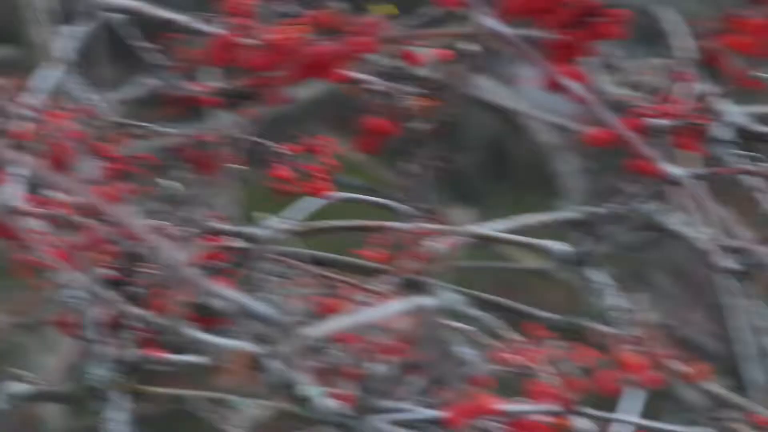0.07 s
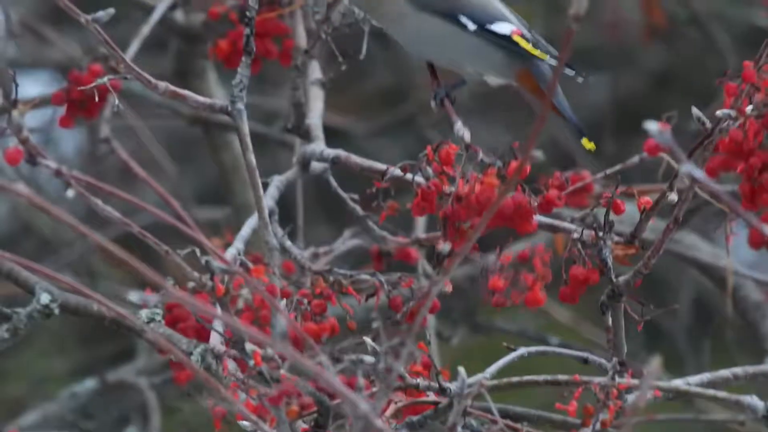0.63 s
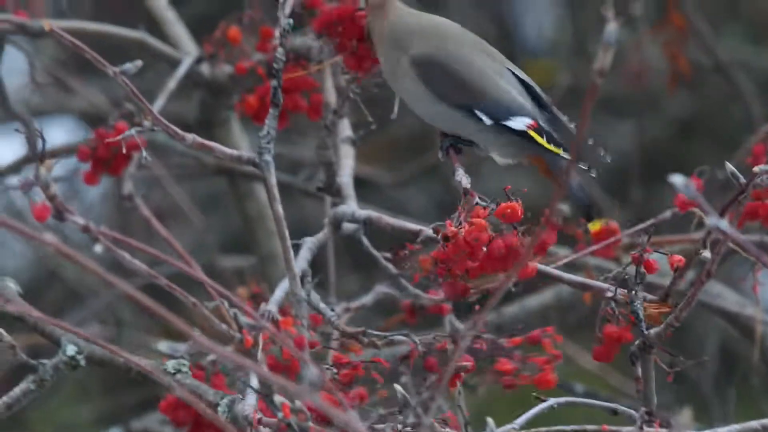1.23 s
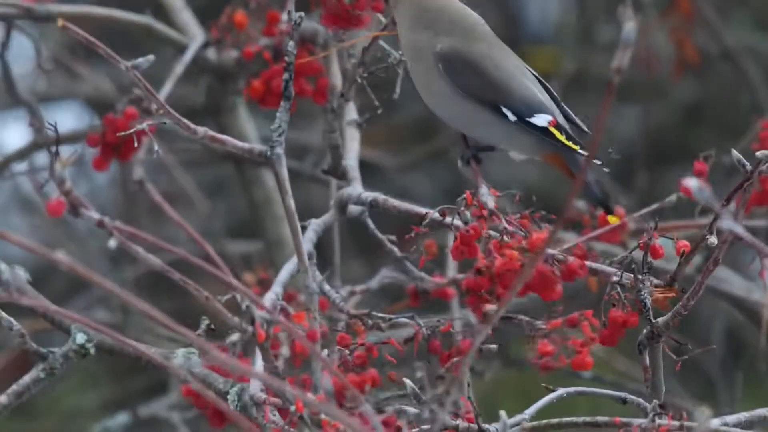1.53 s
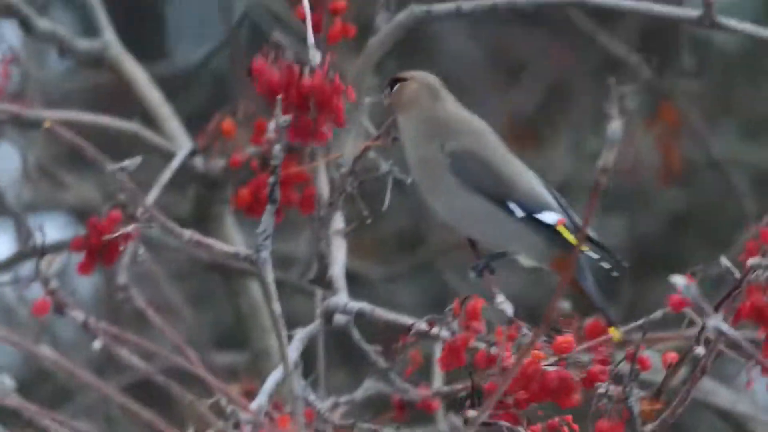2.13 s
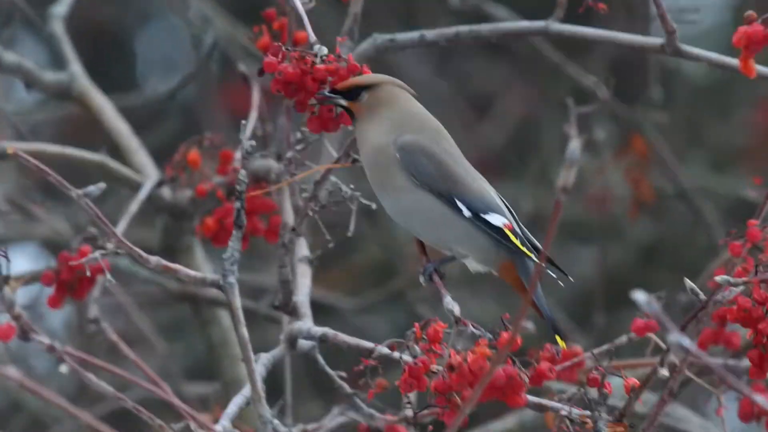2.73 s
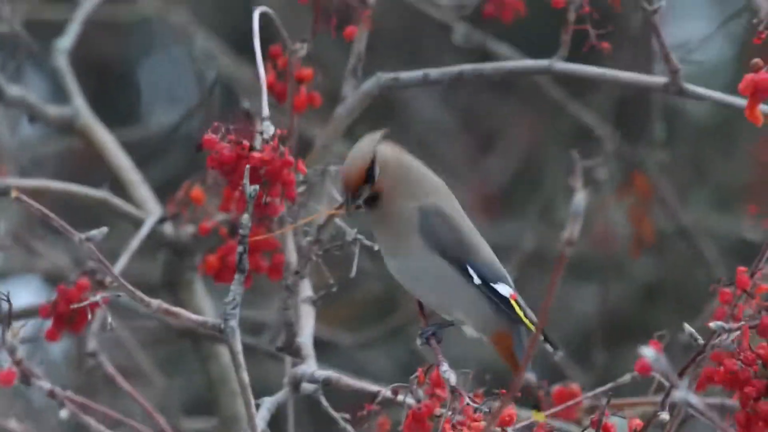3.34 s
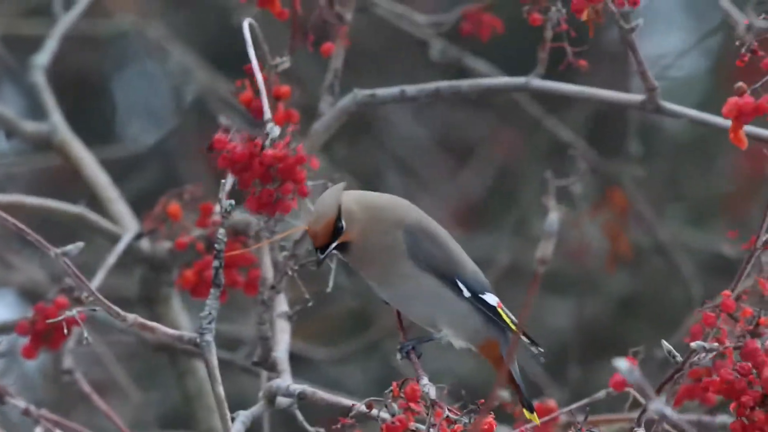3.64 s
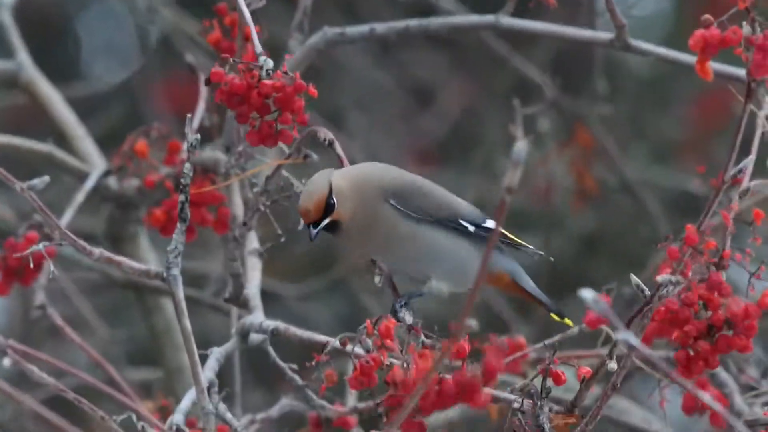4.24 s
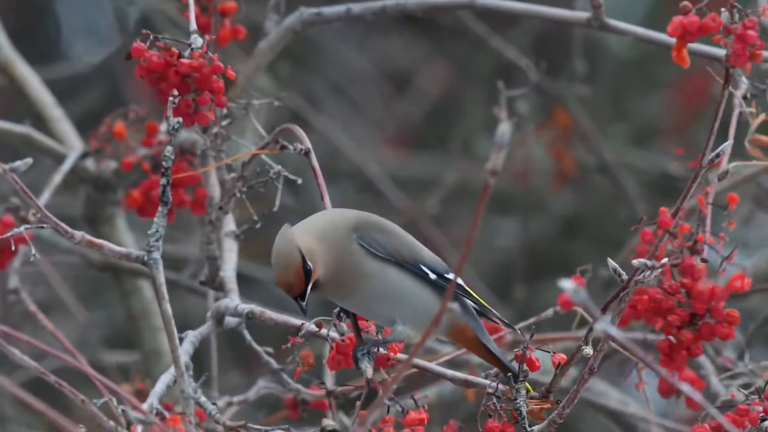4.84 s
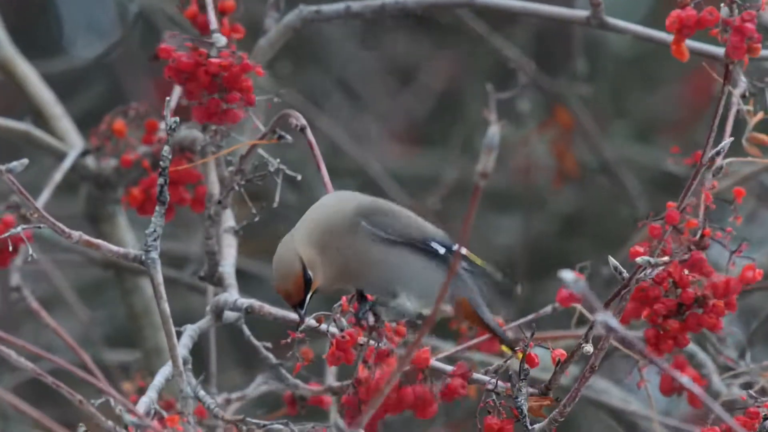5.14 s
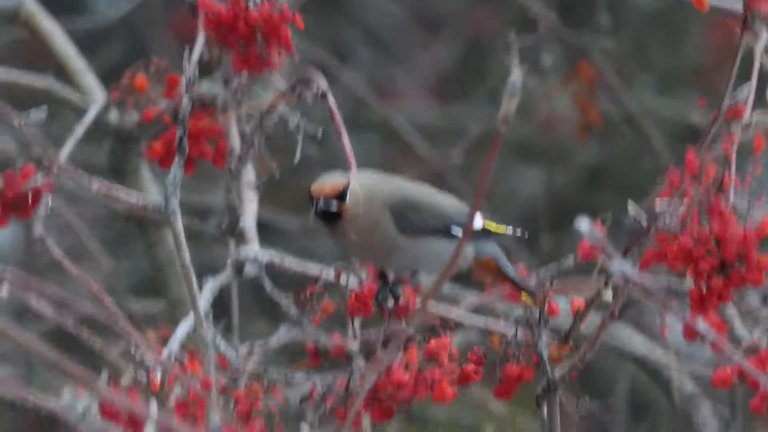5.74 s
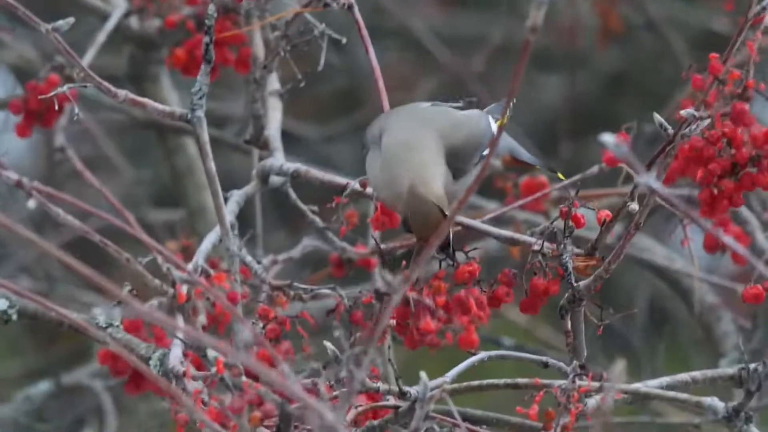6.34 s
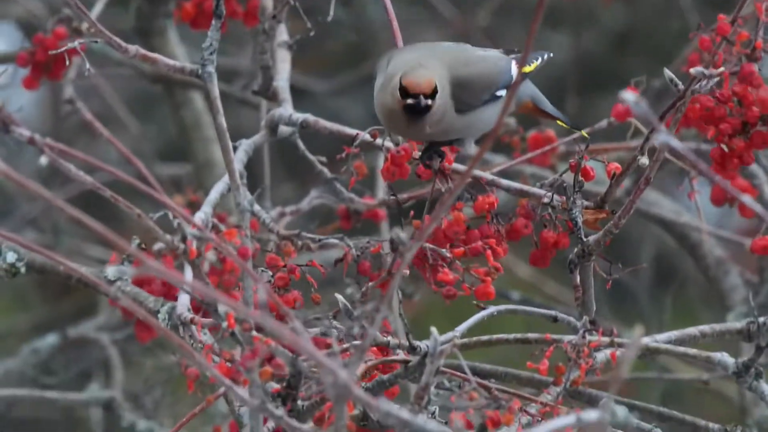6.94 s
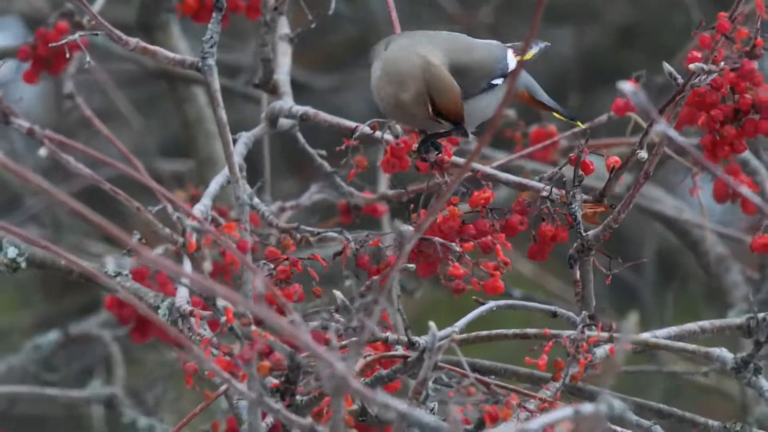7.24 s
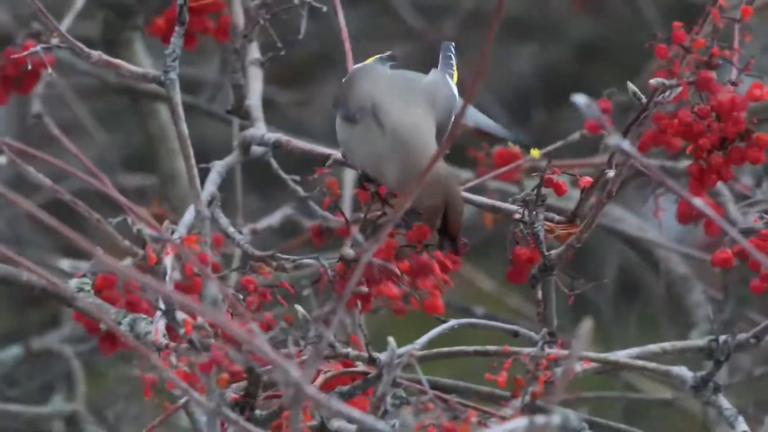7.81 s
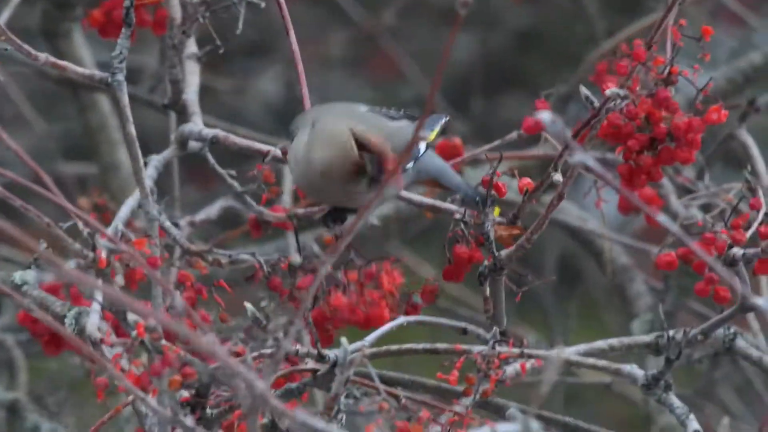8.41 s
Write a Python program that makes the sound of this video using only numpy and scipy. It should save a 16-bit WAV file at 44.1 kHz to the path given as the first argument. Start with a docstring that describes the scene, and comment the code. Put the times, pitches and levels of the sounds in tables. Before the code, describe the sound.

Waxwings overlap in high, shimmering trills, near and far, while wind buffets the microphone over a soft outdoor hiss.

```python
"""High, slurred trills from a flock of waxwings in berry trees. Each trill is a string of short whistles:
near birds stand out note by note, the far ones melt into a shimmering chorus among the trunks.
Wind buffets the two microphone ports and twigs tick, over outdoor hiss and a faint far tone.
At the end one bird sounds both sides of its syrinx in a buzzy two-voiced whistle."""
import sys
import numpy as np
from scipy import signal
from scipy.fft import rfft, irfft, next_fast_len
from scipy.io import wavfile
from scipy.ndimage import uniform_filter1d

SR = 44100
rng = np.random.default_rng(int(sys.argv[2]) if len(sys.argv) > 2 else 0)


def transcribe(u):
    """Save the signal u as a 16-bit wav file named by the first command-line argument.

    u: samples, shape (n,) or (channels, n), limited to [-1, 1]; the rate is SR.
    q: integer samples, one column per channel.
    """
    v = np.clip(np.atleast_2d(u).T, -1, 1)
    q = np.round(v * 32767).astype(np.int16)
    wavfile.write(sys.argv[1], SR, q)


N = 373527
TIME = np.arange(N) / SR

# trills; the faint rows above 5 kHz are overtones of the birds' lower notes:
# first note t/s, last note t/s, pace/(notes per s), speed-up/0-1,
# first top f/Hz, last top f/Hz, fall of a note/Hz, fall time/s, level/dB, crescendo/dB
TRILLS = [(0.026, 1.052, 15.6, 0.08, 2938, 2424, 198, 0.033, -44, -2),
          (0.891, 1.624, 10.8, 0.08, 3813, 3764, 549, 0.047, -50.5, 8),
          (1.997, 2.29, 10.4, 0, 3630, 3710, 600, 0.027, -47.5, -3),
          (2.841, 3.605, 12, 0, 5290, 5130, 350, 0.028, -59.5, 5),
          (3.083, 3.534, 11.2, 0.04, 3760, 3780, 546, 0.046, -50.5, 4),
          (3.192, 3.617, 14, 0.07, 2580, 2520, 240, 0.036, -52, 12),
          (4.189, 4.51, 12.5, 0.06, 2555, 2440, 455, 0.019, -49, 5),
          (4.945, 5.404, 17.4, 0.19, 4016, 3980, 615, .014, -42, 3),
          (5.422, 6.29, 15, 0, 2744, 2356, 181, .025, -43, 0),
          (5.748, 6.453, 14, 0, 7380, 6670, 450, 0.027, -67, 0),
          (5.893, 6.271, 13.2, 0, 4016, 3960, 618, .025, -43, -1),
          (6.617, 7.277, 12.7, 0.05, 3420, 3170, 399, 0.049, -50, 1),
          (6.779, 7.239, 12.4, 0.07, 2563, 2457, 480, 0.021, -46.5, 1),
          (7.336, 7.797, 13, 0.12, 3260, 3093, 501, .036, -41.5, 2.5),
          (7.75, 8.059, 13, 0.08, 3960, 3850, 497, 0.021, -56, 8)]
# single calls and, in the faint rows above 5 kHz, overtones of the birds' lower notes:
# t/s, top f/Hz, fall/Hz, fall time/s, level/dB
CHIRPS = [(.041, 3880, 682, 0.059, -40), (.126, 3800, 928, 0.047, -42), (.213, 4120, 876, 0.037, -39.5),
          (.301, 3730, 860, 0.049, -43.5), (.89, 3675, 473, 0.034, -46.5), (1.879, 2340, 130, 0.031, -43),
          (3.884, 3640, 420, 0.02, -44.5), (4.323, 4200, 635, .035, -49.5), (4.586, 3740, 402, 0.026, -52),
          (4.772, 3600, 484, 0.057, -47), (4.889, 3900, 504, .008, -43.5), (7.284, 3870, 250, 0.024, -49),
          (7.47, 1893, 160, 0.081, -52), (.92, 6260, 350, .035, -62), (2.24, 6150, 200, .03, -62),
          (3.005, 5250, 300, .022, -55)]
# the upward flick that opens a note: top f/Hz, climb/Hz
FLICK = [(2400, 354), (4000, 1060)]


def near_birds(side_db=2.3, quiver_db=4.0, near_db=-45, far_db=-58):
    """The lead: trills, single calls and faint overtones above 5 kHz. Fainter notes carry more echo."""
    near, far = np.zeros((2, 2, N))
    notes = [note for row in TRILLS for note in trill(*row)] + list(CHIRPS)
    for s, top_hz, fall_hz, fall_s, db in notes:
        rise_s, note = slur(top_hz, fall_hz, fall_s, .012, rise_hz=curve(FLICK, top_hz), drop_share=.3)
        sound = panned(amp(db) * note, side_db)
        nearness = np.interp(db, [far_db, near_db], [0, 1])
        add(near, s - rise_s, nearness * sound)
        add(far, s - rise_s, (1 - nearness) * sound)
    near *= amp(quiver_db * drift(140))
    return woods(near, echo_db=-9.5, t60=.5) + woods(far, echo_db=-3, t60=.6)


def trill(first_s, last_s, rate, hurry, first_hz, last_hz, fall_hz, fall_s, db, crescendo_db):
    """A run of notes or overtones, as rows like those of CHIRPS: the pitch glides, the level arches."""
    progress = np.linspace(0, 1, round((last_s - first_s) * rate) + 1)
    detune, accent_db, stretch = rng.standard_normal(size=(30, 3))[:len(progress)].T
    times = first_s + (last_s - first_s) * (progress + hurry * progress * (1 - progress))
    glide_hz = first_hz + (last_hz - first_hz) * progress ** 0.684  # moves fastest at the start
    tops = glide_hz * (1 + 0.0127 * detune)
    soft_ends_db = -1.5 * (2 * progress - 1) ** 2
    levels = db + crescendo_db * (progress - .5) + soft_ends_db + accent_db
    return list(zip(times, tops, fall_hz * np.exp(.08 * stretch), fall_s * np.exp(.16 * stretch), levels))


def slur(top_hz, fall_hz, fall_s, rise_s, rise_hz, drop_share, drop_s=0.0073, dip_s=0.016):
    """One whistled note: it climbs, drops to a shoulder, slides and dips. Returns rise time and sound."""
    t = np.arange(-rise_s, fall_s + dip_s, 1 / SR)
    falling = np.clip(t, 0, fall_s)
    sag = drop_share * (1 - np.exp(-falling / drop_s)) + (1 - drop_share) * falling / fall_s
    flick_hz = rise_hz * np.minimum(t, 0) / rise_s
    dip_hz = 0.92 * rise_hz * np.maximum(t - fall_s, 0) / dip_s
    phase = 2 * np.pi * np.cumsum(top_hz - fall_hz * sag + flick_hz - dip_hz) / SR
    swell = np.interp(t, [-rise_s, -rise_s / 2, fall_s / 2, fall_s, fall_s + dip_s], [0, 1, 1, .9, 0])
    return rise_s, swell * (np.sin(phase) + amp(-30) * np.sin(2 * phase))  # a sine with a faint octave


# the closing whistle, one pitch for each side of the syrinx: t/s, upper f/Hz, lower f/Hz, level/dB
WHISTLE = [(8.28, 4540, 4120, -66), (8.295, 4600, 4007, -45), (8.32, 4350, 3720, -45),
           (8.34, 4280, 3940, -43), (8.36, 4300, 3890, -45.5), (8.445, 4420, 3940, -46),
           (8.47, 4250, 3910, -47)]


def whistle(lower_db=-1.0, waver_hz=30):
    """Both sides of the syrinx sound at once and beat into a buzz."""
    t = np.arange(WHISTLE[0][0], WHISTLE[-1][0], 1 / SR)
    upper = sine(curve(WHISTLE, t, column=1) + waver_hz * drift(200)[:len(t)])
    lower = sine(curve(WHISTLE, t, column=2) + waver_hz * drift(200)[:len(t)])
    buzz = amp(curve(WHISTLE, t, column=3)) * (upper + amp(lower_db) * lower)
    out = np.zeros((2, N))
    add(out, t[0], panned(buzz, side_db=2))
    return woods(out, echo_db=-8, t60=0.43)


# fader and pitch ride of the low chorus: t/s, level/dB before low_db, f/Hz before lift_hz
LOW_VOICES = [(0.3, -53, 2540), (0.8, -49, 2362), (1.64, -54, 2460), (1.85, -50.5, 2336), (2.17, -53, 2476),
              (2.76, -49.5, 2379), (3.03, -49.5, 2482), (4.49, -45, 2400), (4.78, -45, 2313),
              (5.12, -47.5, 2400), (5.74, -42, 2430), (5.94, -43.5, 2370), (6.42, -46, 2247),
              (6.51, -44.5, 2434), (7.44, -43.5, 2385), (7.76, -48.5, 2502), (8.13, -45.5, 2504),
              (8.47, -45, 2398)]
# fader ride of the far wash and, raised by high_db, the high chorus: t/s, level/dB
HIGH_VOICES = [(0.42, -50), (0.78, -51.5), (1.52, -47), (1.79, -49.5), (2.21, -48), (2.91, -53.5),
               (3.36, -50.5), (4.27, -51.5), (4.77, -52.5), (5.2, -47), (5.55, -51), (5.85, -49.5),
               (6.09, -50), (6.43, -51.5), (6.7, -53), (6.97, -49), (7.37, -52.5), (8.47, -48)]
# colour of the far wash, voices blurred by the wood: f/Hz, relative level/dB
FAR_WASH = [(1700, -49), (2100, -2), (2300, -0.5), (2800, 0.5), (3350, -4), (3650, -16.5), (3950, -20.5),
            (4500, -42)]


def flock(low_db=4, high_db=5, lift_hz=140):
    """A low and a high chorus, and behind them a wash of birds too many and too far to tell apart."""
    low_hz, high_hz = curve(LOW_VOICES, TIME, column=2) + lift_hz, np.full(N, 3580.)
    low = chorus(low_hz, fall_hz=203.3, fall_s=0.02575, rate=14, spread=0.0315, uneven_db=3.0, birds=3)
    high = chorus(high_hz, fall_hz=581.5, fall_s=.036, rate=12, spread=.042, uneven_db=3.5, birds=4)
    wash = unit_rms(noise(FAR_WASH, likeness=0.57))
    low_layer = amp(curve(LOW_VOICES, TIME) + low_db) * low
    high_layer = amp(curve(HIGH_VOICES, TIME)) * (amp(high_db) * high + wash)
    return panned(low_layer + high_layer, side_db=3.0)


def chorus(top_hz, fall_hz, fall_s, rate, spread, uneven_db, birds):
    """Several birds trill on, each at its own pace and place; the blend is held at a steady level."""
    out = np.zeros((2, N))
    for _ in range(birds):
        pace, place, offset = rng.uniform(-1, 1, 3)
        for k, (late, detune, accent, stretch) in enumerate(rng.standard_normal(size=(170, 4))):
            s = (k + offset + .08 * late) / (rate * (1 + .15 * pace))
            if 0 <= s < TIME[-1]:
                hz = top_hz[int(s * SR)] * (1 + spread * detune)
                slide_s = fall_s * np.exp(0.1977 * stretch)
                rise_s, note = slur(hz, fall_hz, slide_s, rise_s=.013, rise_hz=fall_hz, drop_share=0.133)
                add(out, s - rise_s, panned(amp(uneven_db * accent) * note, side_db=5 * place))
    out = woods(out, echo_db=-4, t60=.7, lead_s=.00018)
    running_power = uniform_filter1d((out ** 2).mean(0), size=SR // 4)
    return out / np.sqrt(running_power + 1e-9)


# gusts that swell and die away: peak t/s, half width/s, level/dB, left-right/dB
GUSTS = [(1.31, .09, -36.5, -1.5), (2.549, 0.077, -34, -4.5), (2.931, 0.061, -28.5, -6.5),
         (3.3, 0.15, -46, 6), (3.85, 0.13, -36.5, -4), (4.34, 0.034, -37, -2), (4.6, .2, -53.5, 0),
         (5.49, 0.047, -41, 1), (5.72, 0.066, -34.5, -15), (6.1, .13, -40, -1.5), (6.6, 0.16, -32.5, 5),
         (6.979, 0.074, -29, 3.5), (7.37, 0.059, -34, 0.5), (7.68, 0.049, -23.5, 4), (7.84, 0.059, -38, -1)]
# colour of wind over a port: f/Hz, relative level/dB
RUMBLE = [(20, -19), (45, -10.5), (75, 4.5), (130, -1.5), (220, -12), (320, -15.5), (600, -33), (1500, -44),
          (4000, -90)]
# colour of the flutter in a strong gust: f/Hz, relative level/dB
FLUTTER = [(60, -30), (150, 2), (280, 1), (420, -12.5), (700, -19), (1200, -51), (4000, -75)]


def wind(breeze_db=-52.5, lump_db=4.0, flutter_db=-11, strong_db=-27, flutter_growth=1.84):
    """Lumpy turbulence at each port: rumble follows the gusts, flutter grows faster than they do."""
    power = amp(breeze_db) ** 2
    for s, width, db, side_db in GUSTS:
        fade = np.exp(-abs(TIME - s) / width)
        swell = 2 * fade / (1 + fade ** 2)
        power = power + panned(amp(db) * swell, side_db) ** 2
    lumps = unit_rms(amp(lump_db * np.array([drift(31), drift(13.3)])))
    force = np.sqrt(power) * lumps
    rumble = force * unit_rms(noise(RUMBLE, likeness=0.19))
    flutter_gain = amp(strong_db + flutter_db) * (force / amp(strong_db)) ** flutter_growth
    return rumble + flutter_gain * unit_rms(noise(FLUTTER, likeness=0.082))


# the hardest thumps within the gusts: t/s, level/dB, centre f/Hz, half width/s, left-right/dB
BUFFETS = [(0.761, -15, 95.7, 0.0086, 33), (0.817, -27.5, 169, 0.012, -22),
           (1.363, -18, 190.6, 0.0069, -25), (2.513, -19.5, 233, 0.0035, -25), (2.57, -23, 158, 0.0066, 0),
           (2.89, -24.5, 206.3, 0.0092, -19), (2.944, -7.5, 327.6, 0.0023, -37),
           (2.96, -15, 259, 0.0052, -34), (3.046, -22.5, 287, 0.014, -29), (3.681, -25, 103, 0.0096, -25),
           (3.932, -17, 246.8, 0.0046, -33), (5.617, -28.5, 100, 0.019, -25),
           (5.698, -24.5, 129.4, 0.014, -23), (5.763, -24, 169.7, 0.024, -30),
           (6.096, -26.5, 136, 0.0073, -20), (6.511, -19.5, 89, 0.0059, 32), (6.61, -26, 165.5, 0.017, 20),
           (6.768, -21.5, 86, 0.013, 2), (6.898, -17.5, 133.3, 0.0085, 26),
           (6.917, -13.5, 160.9, 0.0058, 25), (6.972, -16, 115.6, 0.011, -2),
           (7.521, -20.5, 85.3, 0.011, 1.5), (7.646, -14, 81.4, .018, -4), (7.694, -15.5, 364, 0.0042, 30),
           (7.712, -11, 320.3, 0.0064, 27), (7.717, -18, 622.4, 0.0025, 22),
           (7.736, -13.5, 101.6, 0.016, -2)]


def buffets(churn=0.1926, churn_hz=200, steepen=.22):
    """A large eddy shoves the air back and forth for a few cycles; the wave steepens at its height."""
    out, t = np.zeros((2, N)), np.arange(-SR // 20, SR // 20) / SR
    for s, db, hz, width, side_db in BUFFETS:
        swell = signal.windows.tukey(len(t), .5) / np.cosh(np.pi / 2 * t / width)
        cycles = [rng.random() + np.cumsum(hz * (1 + churn * drift(churn_hz, len(t)))) / SR
                  for port in range(2)]
        phase = 2 * np.pi * np.array(cycles)
        thump = swell * np.sin(phase + steepen * swell * np.sin(phase))
        add(out, s + t[0], panned(amp(db) * thump, side_db))
    return out


# twig ticks: t/s, level/dB, centre f/Hz
TICKS = [(0.307, -44, 800), (0.442, -41, 595), (1.769, -45.5, 1400), (4.833, -42.5, 1000),
         (5.227, -49, 1000), (5.368, -45, 1500), (6.809, -39.5, 1800), (6.893, -44, 1400),
         (6.956, -48, 1210), (7.899, -46, 1260), (8.194, -40, 2200)]


def twigs(decay_s=0.021, band_ratio=1.83):
    """Dull taps and dry little snaps as the birds pull at the berries."""
    out, t = np.zeros((2, N)), TIME[:SR // 20]
    edge = np.sqrt(band_ratio)
    for s, db, hz in TICKS:
        band = signal.butter(2, [hz / edge, hz * edge], "bandpass", fs=SR, output="sos")
        burst = unit_rms(signal.sosfilt(band, rng.standard_normal((2, len(t)))))
        add(out, s, amp(db) * np.exp(-t / decay_s) * burst)
    return out


def hum(hz=667, db=-69, waver_hz=4, fade_db=3):
    """A faint, far tone that wavers and fades in and out."""
    return amp(db + fade_db * drift(1.5)) * sine(hz + waver_hz * drift(7.7))


# the bed of outdoor hiss: f/Hz, level/(dB per Hz)
HISS = [(20, -110), (50, -84), (85, -72.5), (200, -80), (350, -80.5), (680, -82.5), (1000, -85),
        (1400, -85), (1900, -83), (4000, -92.5), (5000, -92.5), (6300, -102), (8000, -110.5), (11000, -114)]


def air():
    """Outdoor hiss, much alike at both ports in the bass and wide in the treble."""
    likeness = np.interp(np.fft.rfftfreq(N, 1 / SR), [60, 300, 1200, 2400], [0.7, 0.76, 0.28, 0.16])
    return noise(HISS, likeness)


def woods(x, echo_db, t60, lead_s=.00004):
    """The direct sound reaches the left port first; trunks and branches add a tail of sparse echoes."""
    t = TIME[:SR]
    direct = np.array([np.interp(TIME + lead_s, TIME, x[0]), x[1]])
    echoes = rng.standard_normal((2, SR)) * (rng.random((2, SR)) < .05)
    tail = echoes * amp(-60 * t / t60) * (1 - np.exp(-t / 0.015))
    tail /= np.linalg.norm(tail, axis=1, keepdims=True)
    return direct + amp(echo_db) * signal.fftconvolve(x, tail, axes=1)[:, :N]


def noise(spectrum, likeness):
    """Stereo noise with a given level per Hz; likeness is the correlation of its channels."""
    hz, db = np.transpose(spectrum)
    gain = amp(np.interp(np.log(np.fft.rfftfreq(N, 1 / SR) + 1), np.log(hz), db))
    left, other = rfft(rng.standard_normal((2, N)))
    right = likeness * left + np.sqrt(1 - likeness ** 2) * other
    return irfft(np.array([left, right]) * gain, N) * np.sqrt(SR / 2)


def drift(hz, size=N):
    """Smooth random motion of rms 1, at rates up to about hz."""
    full = next_fast_len(size)
    lowpass = np.exp(-(np.fft.rfftfreq(full, 1 / SR) / hz) ** 2)
    return unit_rms(irfft(rfft(rng.standard_normal(full)) * lowpass, full)[:size])


def panned(x, side_db):
    """Shares a sound between left and right at constant power."""
    return unit_rms(amp([[side_db / 2], [-side_db / 2]])) * x


def add(mix, s, sound):
    """Adds a stereo sound at time s."""
    start = round(s * SR)
    sound = sound[:, max(-start, 0):]
    part = mix[:, max(start, 0):][:, :sound.shape[1]]
    part += sound[:, :part.shape[1]]


def curve(table, at, column=1):
    """One column of a table, joined by straight lines along the first."""
    columns = np.transpose(table)
    return np.interp(at, columns[0], columns[column])


def sine(hz):
    return np.sin(2 * np.pi * np.cumsum(hz) / SR)


def amp(db):
    return 10 ** (np.asarray(db) / 20)


def unit_rms(x):
    return x / np.sqrt(np.mean(x ** 2) + 1e-20)


def scene():
    """Birds in front, wind on the ports, twigs and a quiet bed behind."""
    return near_birds() + flock() + whistle() + wind() + buffets() + twigs() + hum() + air()


def record(dry):
    """The recorder's band limit cuts the top end at 10950 Hz."""
    lowpass = signal.firwin(511, 10950, window=("kaiser", 9), fs=SR)
    return signal.oaconvolve(dry, lowpass[None], "same")


dry = scene()
out = record(dry)
transcribe(out)
```